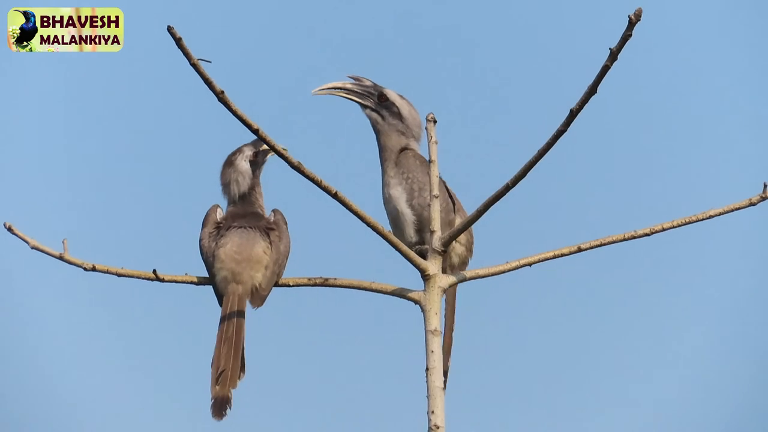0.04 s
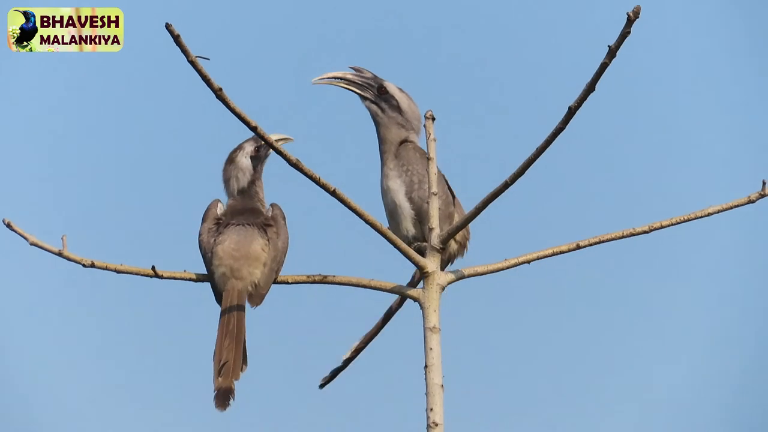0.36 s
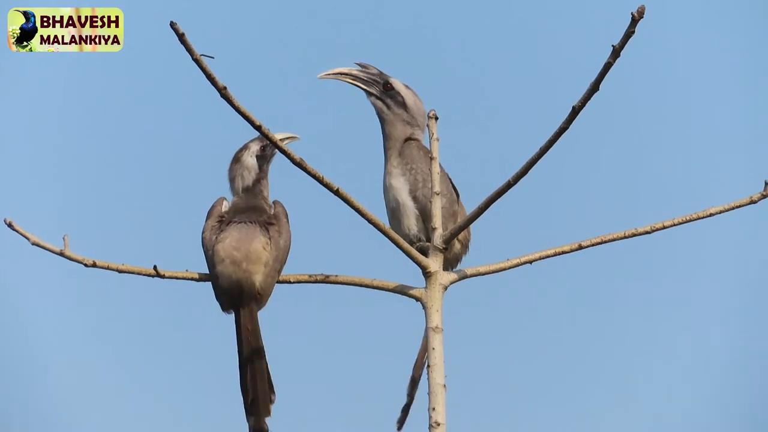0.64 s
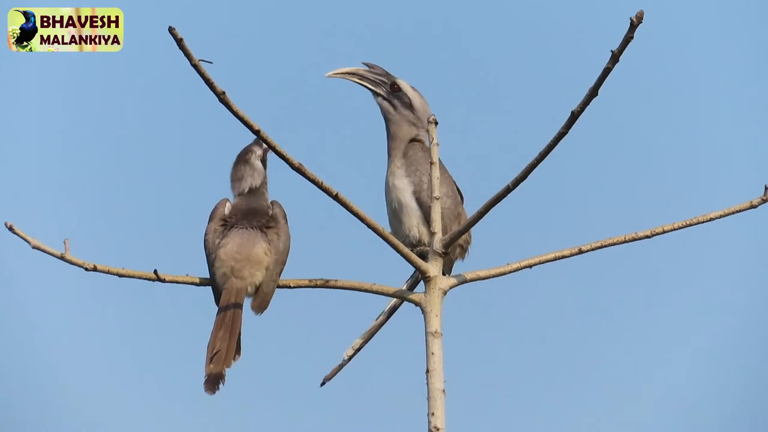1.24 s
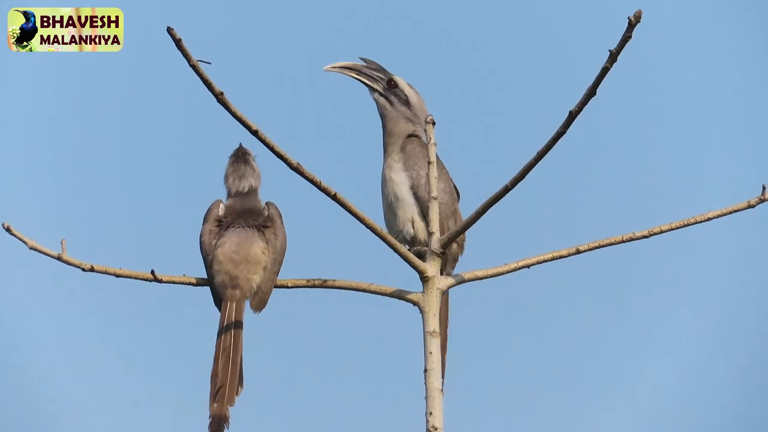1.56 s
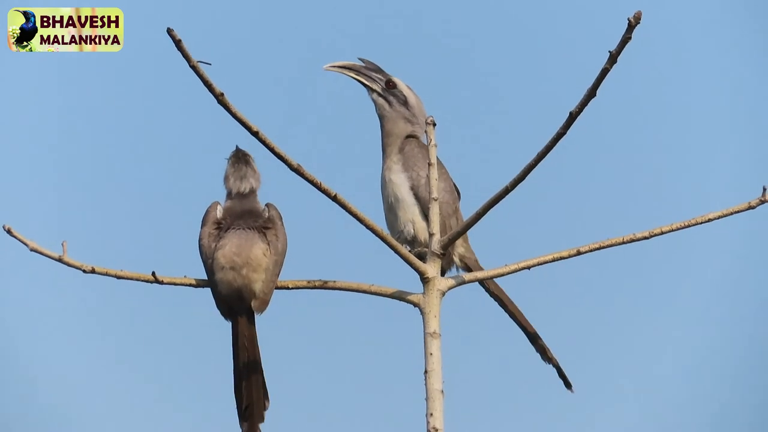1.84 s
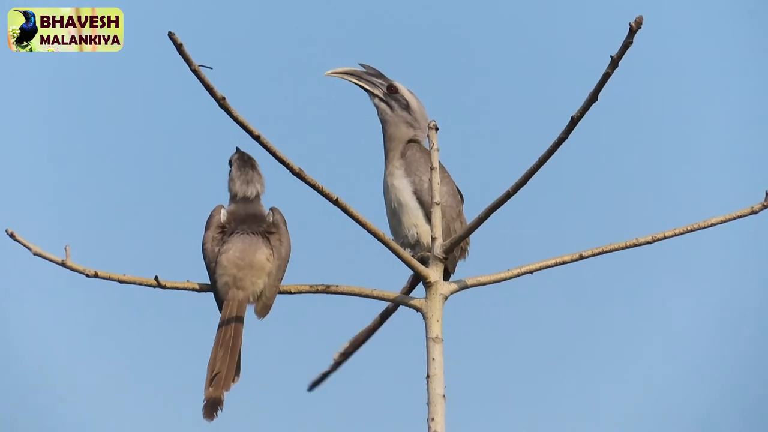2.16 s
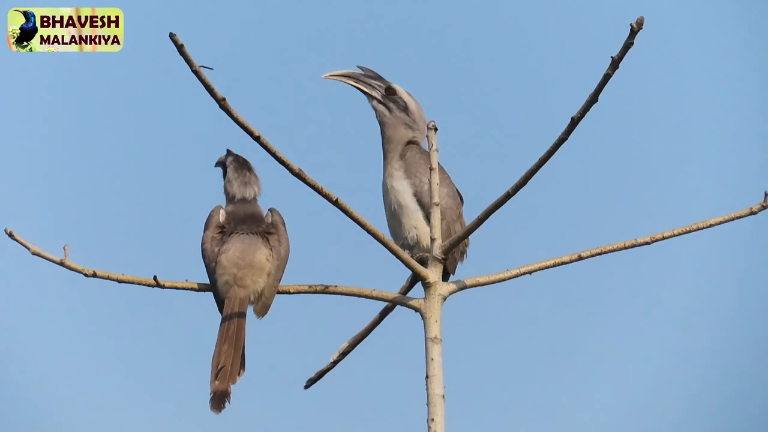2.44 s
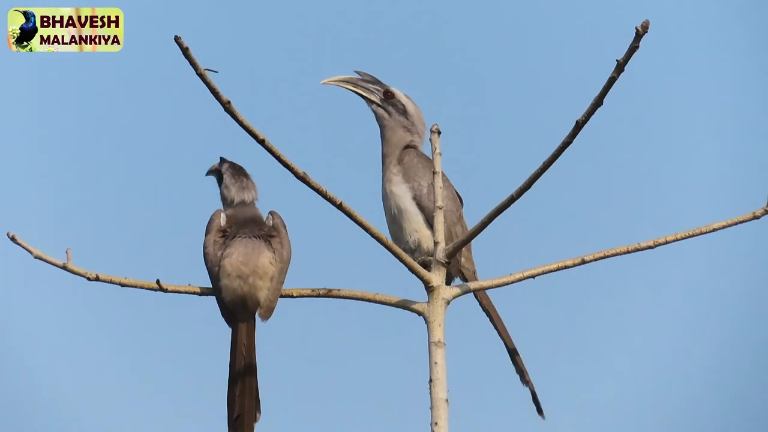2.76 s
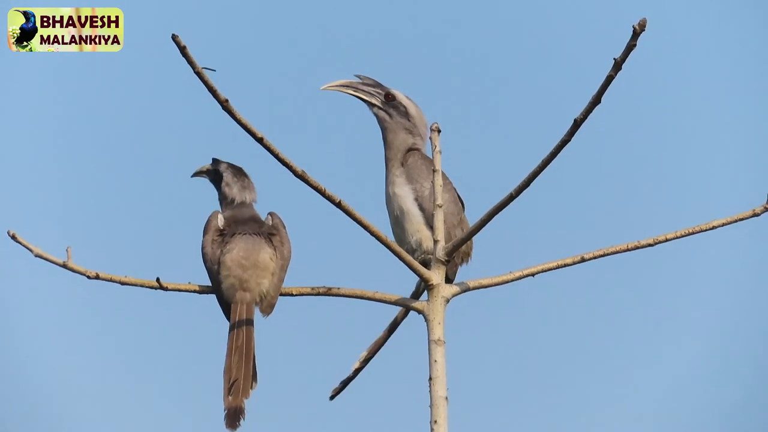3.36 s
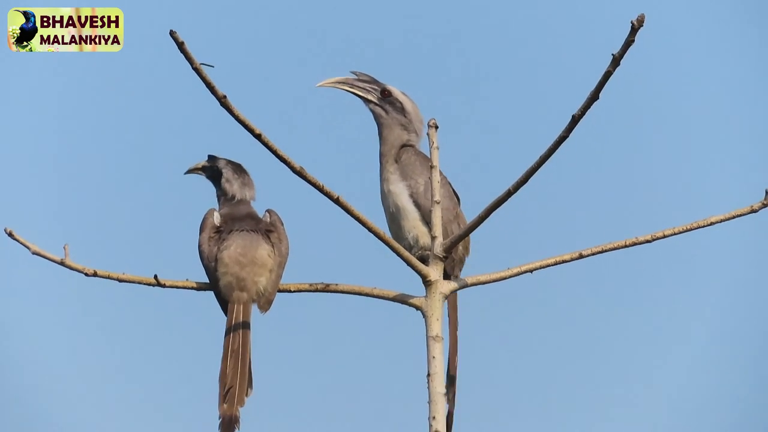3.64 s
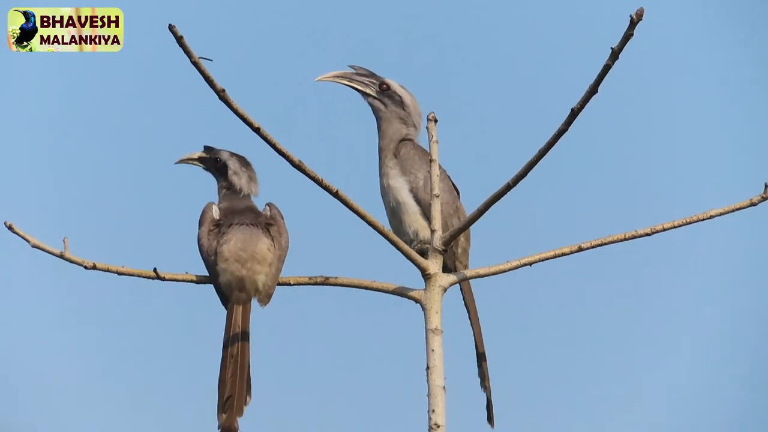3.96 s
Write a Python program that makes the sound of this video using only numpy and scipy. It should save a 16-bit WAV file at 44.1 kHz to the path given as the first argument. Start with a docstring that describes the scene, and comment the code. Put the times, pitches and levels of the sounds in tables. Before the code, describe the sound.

Two hornbills squeal and croak in quick bursts over steady traffic noise.

```python
"""Thin arched squeals and chattering croaks from two grey hornbills in a bare tree.
A croak is a rasp of pulses ringing the throat, in which the voice hops between three throat pitches.
A lower second voice slides under each squeal; twice the two mix into harsh sum tones.
A small bird chirps far off, all over the rumble and swelling hiss of traffic."""
import sys
import numpy as np
from scipy import signal
from scipy.fft import rfft, irfft, next_fast_len
from scipy.io import wavfile
from scipy.ndimage import map_coordinates

SR = 44100
rng = np.random.default_rng(int(sys.argv[2]) if len(sys.argv) > 2 else 0)


def log_audio(samples):
    """Write samples as a 16-bit WAV file to the path given in sys.argv[1]."""
    # one column per channel
    frames = np.atleast_2d(samples).T
    # limit to full scale, then quantise
    limited = np.clip(frames, -1, 1)
    pcm = np.round(limited * 32767).astype(np.int16)
    wavfile.write(sys.argv[1], SR, pcm)


N = 176400
T = np.arange(N) / SR

# Pips within the croaks. Each row: centre in seconds, pitch in Hz, relative level in dB.
CROAK_PIPS = [(0.003, 1840, -32), (0.02, 1830, -33), (0.024, 2250, -32.5), (0.264, 2470, -35.5),
              (0.285, 1830, -31), (0.302, 2380, -31), (0.306, 1860, -29), (0.323, 1890, -32.5),
              (0.328, 3170, -38), (0.346, 1750, -36.5), (0.355, 2960, -40.5), (0.575, 1785, -34),
              (0.591, 3110, -33), (0.608, 1900, -35.5), (0.614, 3130, -33.5), (0.621, 1840, -31.5),
              (0.637, 3080, -35), (0.644, 1800, -33), (0.749, 2920, -36.5), (0.758, 1750, -30),
              (0.875, 1770, -35), (0.882, 1730, -30.5), (0.894, 1830, -32.5), (0.898, 3100, -32),
              (0.906, 1765, -33), (0.916, 1830, -30), (0.921, 3130, -31.5), (1.046, 2770, -34.5),
              (1.052, 1730, -34), (1.151, 2350, -30.5), (1.167, 1740, -35), (1.171, 3060, -28.5),
              (1.19, 2360, -32.5), (1.194, 3040, -30), (1.203, 1840, -31.5), (1.317, 2240, -32),
              (1.319, 2830, -34.5), (1.328, 1710, -31), (1.434, 2320, -32), (1.438, 2950, -28),
              (1.447, 1790, -35), (1.464, 3000, -27.5), (1.473, 1780, -36.5), (2.074, 2890, -35),
              (2.1, 2940, -32.5), (2.104, 1750, -34), (2.128, 2920, -39), (2.151, 2350, -40),
              (2.364, 2350, -33), (2.365, 2810, -34.5), (2.375, 1900, -35.5), (2.389, 2800, -36)]


def amp(db):
    """Decibels to gain."""
    return 10 ** (np.asarray(db) / 20)


def unit(x):
    """Scale to rms 1."""
    return x / np.sqrt(np.mean(x ** 2) + 1e-20)


def along(points, hz):
    """Interpolate (Hz, value) points on a log frequency axis."""
    knots_hz, values = np.transpose(points)
    return np.interp(np.log(hz + 1), np.log(knots_hz + 1), values)


def curves(rows):
    """One value per sample for each column after the time."""
    times_s, *columns = np.transpose(rows)
    return [np.interp(T, times_s, column) for column in columns]


def wobble(rate_hz, t):
    """Smooth random curve over t, rate_hz knots a second."""
    position = (t - t[0]) * rate_hz
    return map_coordinates(rng.standard_normal(4096), [position], mode="mirror")


def filtered(x, response):
    """Apply a frequency response, given as a function of Hz."""
    size = next_fast_len(N + SR // 4)
    return irfft(rfft(x, size) * response(np.fft.rfftfreq(size, 1 / SR)), size)[..., :N]


def noise(spectrum):
    """Coloured stereo noise of rms 1, near mono in the bass."""
    # Each row: frequency in Hz, left-right correlation.
    correlation = [(50, 1), (120, 1), (200, 0.93), (320, 0.4), (550, 0.89), (1200, 1), (3000, 1), (5000, 1),
                   (8000, .35)]

    def mid_side_gains(hz):
        angle = np.arccos(np.clip(along(correlation, hz), -1, 1)) / 2
        return amp(along(spectrum, hz)) * [np.cos(angle), np.sin(angle)]

    mid, side = filtered(rng.standard_normal((2, N)), mid_side_gains)
    return unit(np.array([mid + side, mid - side]))


def note(start_s, length_s, attack_s, release_s):
    """Sample indices, times and attack-hold-release envelope of one note."""
    i = np.flatnonzero((T >= start_s) & (T < start_s + length_s))
    t = T[i]
    ramp = np.minimum((t - start_s) / attack_s, (start_s + length_s - t) / release_s)
    return i, t, np.sin(np.pi / 2 * np.clip(ramp, 0, 1))


def phase(hz, t, jitter=0.012):
    """Phase of a slightly unsteady voice."""
    unsteady_hz = hz * (1 + jitter * wobble(940, t))
    return 2 * np.pi * (rng.random() + np.cumsum(unsteady_hz) / SR)


def from_right(x, lag_s):
    """Stereo in which the left channel trails the right by lag_s."""
    return filtered(x, lambda hz: np.exp(1j * np.pi * hz * lag_s * np.array([[-1], [1]])))


def squeals(end_hz=2513, flutter_hz=330, flutter_db=4, shimmer_db=1):
    """A thin whistle arches up, then sinks and flutters; its octave is strong only near the crest."""
    # Each row: start, crest and end in seconds, crest pitch in Hz, arch exponent,
    # fundamental and octave levels at the crest in dB.
    calls = [(0.056, 0.081, .146, 3090, 1.9, -38.5, -45), (0.385, 0.427, .484, 3003, 1.38, -41, -43),
             (0.949, 0.965, 1.022, 3005, 2.7, -38.5, -39.5), (3.222, 3.251, 3.335, 3120, 1.65, -32, -40)]
    out = np.zeros(N)
    for start_s, crest_s, end_s, crest_hz, arch, db, octave_db in calls:
        i, t, env = note(start_s, end_s - start_s, attack_s=0.004, release_s=0.0054)
        sag = np.abs((t - crest_s) / (end_s - crest_s)) ** arch  # 0 at the crest, 1 at the end
        ph = phase(crest_hz - (crest_hz - end_hz) * sag, t, jitter=0.005)
        env = env * amp(flutter_db * np.sqrt(sag) * wobble(flutter_hz, t))
        third_db = -71 - 4 * sag + 3.5 * wobble(flutter_hz, t)
        harmonics_db = [db - 9.5 * sag, octave_db - 28.5 * sag, third_db]
        for k, level_db in enumerate(harmonics_db, 1):
            gain = amp(level_db + shimmer_db * wobble(flutter_hz, t))
            out[i] += np.sqrt(2) * env * gain * np.sin(k * ph)
    return out


def slides():
    """The lower voice glides briefly, with weak overtones coloured by the bill."""
    # Each row: start and length in seconds, first and last pitch in Hz, level and overtone gain in dB.
    glides = [(0.034, 0.02, 1613, 1894, -32, -3), (.446, 0.023, 1740, 1727, -34, -5),
              (.925, .029, 1553, 2240, -34.5, 1), (3.203, 0.03, 2113, 2390, -33, -1)]
    # Overtone colour. Each row: frequency in Hz, gain in dB.
    bill_response = [(3500, -16), (4600, -25), (5400, -27), (7200, -22), (8300, -29), (10000, -47)]
    out = np.zeros(N)
    for start_s, length_s, from_hz, to_hz, db, overtones_db in glides:
        i, t, env = note(start_s, length_s, attack_s=0.005, release_s=0.0035)
        hz = from_hz + (to_hz - from_hz) * (t - start_s) / length_s
        ph = phase(hz, t, jitter=0.014)
        overtones = sum(amp(along(bill_response, k * hz)) * np.sin(k * ph) for k in range(2, 6))
        out[i] += np.sqrt(2) * env * amp(db) * (np.sin(ph) + amp(overtones_db) * overtones)
    return out


def pips(edge_s=0.0046, stretch_per_db=0.035, trim_db=-1, octave_db=-32):
    """The croaking voice locks on to one throat resonance after another; stronger pips hold longer."""
    out = np.zeros(N)
    for centre_s, hz, db in CROAK_PIPS:
        length_s = 0.0115 * np.exp(stretch_per_db * (db + 32))
        i, t, env = note(centre_s - length_s / 2, length_s, edge_s, edge_s)
        ph = phase(hz, t)
        out[i] += amp(db + trim_db) * env * (np.sin(ph) + amp(octave_db) * np.sin(2 * ph))
    return out


def throat_ring(age_s, rise_s=0.0009, t60_s=0.014, pitch_spread=0.036, spread_db=3.5):
    """One pulse rings the throat, a little differently each time."""
    # Each row: resonance in Hz, relative level in dB.
    modes = [(1800, 1.5), (2380, 2), (3080, -3.5), (3600, -10), (4400, -11)]
    hz, mode_db = np.transpose(modes)[:, :, None]
    detune, vary = rng.standard_normal((2, len(modes), 1))
    decay = amp(mode_db + spread_db * vary - 60 * age_s / t60_s)
    rings = decay * np.sin(2 * np.pi * hz * (1 + pitch_spread * detune) * age_s)
    return rings.sum(0) * (1 - np.exp(-age_s / rise_s))


def rasp(pulse_hz=330, flare_gain=0.45, flare_lead_s=0.0047, flare_width_s=0.0037, air_rough_db=5):
    """Uneven throat pulses flare just ahead of each pip; air hisses at the height of the croak."""
    # Each row: start and length in seconds, rasp and air levels in dB.
    croaks = [(-.01, 0.04, -42, -64), (0.274, 0.098, -41.5, -63), (.568, 0.098, -41, -59.5),
              (0.733, 0.038, -42.5, -66), (0.858, 0.089, -40, -62), (1.029, 0.056, -47, -76),
              (1.146, 0.085, -42, -65), (1.312, 0.04, -43, -74), (1.428, 0.065, -41, -69),
              (2.07, 0.09, -45.5, -89), (2.357, 0.049, -46.5, -80)]
    # Each row: frequency in Hz, gain in dB.
    air_spectrum = [(3000, -25), (4500, 3), (7000, -1), (8500, 5.5), (10500, 1), (13000, -16)]
    out, air_env = np.zeros((2, N))
    age_s = T[:SR // 40]
    for start_s, length_s, db, air_db in croaks:
        i, t, env = note(start_s, length_s, attack_s=0.009, release_s=0.009)
        rattle = np.zeros(len(t) + len(age_s))
        for pulse in range(int(length_s * pulse_hz)):
            pulse_s = start_s + (pulse + rng.random()) / pulse_hz
            onset = np.searchsorted(t, pulse_s)
            rattle[onset:onset + len(age_s)] += throat_ring(age_s) * (pulse_s > 0)
        flares = [np.exp(-((t - pip_s + flare_lead_s) / flare_width_s) ** 2)
                  for pip_s, _, _ in CROAK_PIPS]
        emphasis = 1 + flare_gain * np.max(flares, axis=0)
        out[i] += amp(db) * env * unit(rattle[:len(t)] * emphasis)
        roughness = unit(amp(air_rough_db * np.tanh(wobble(pulse_hz, t))))
        air_env[i] += amp(air_db) * np.sin(np.pi * (t - start_s) / length_s) * roughness
    return out + air_env * noise(air_spectrum)[0]


def voice_breaks(low_hz=2125, high_hz=2990):
    """Where the lower voice breaks into the squeal, the two mix into harsh sum tones."""
    # Each row: start and length in seconds, level in dB.
    overlaps = [(0.938, 0.018, -48), (3.223, 0.016, -55)]
    out = np.zeros(N)
    for start_s, length_s, db in overlaps:
        i, t, env = note(start_s, length_s, attack_s=0.004, release_s=0.003)
        low, high = phase(low_hz, t), phase(high_hz, t)
        out[i] += amp(db) * env * (np.sin(high + low) + np.sin(3 * low) + np.sin(high + 2 * low))
    return out


def small_bird(flutter_hz=132, flutter_db=3.6):
    """Faint gliding chirps from far away."""
    # Each row: start and length in seconds, first and last pitch in Hz, relative level in dB.
    chirps = [(0.794, 0.065, 5220, 5170, -63), (1.451, 0.07, 7560, 6950, -61),
              (1.55, 0.08, 5250, 5140, -60), (1.705, 0.12, 7000, 7300, -65), (1.925, 0.05, 5100, 4980, -58),
              (2.256, 0.11, 4750, 5620, -62), (2.549, 0.051, 3560, 2600, -51),
              (2.843, .12, 5500, 5200, -65), (3.34, 0.091, 5200, 5030, -64),
              (3.685, 0.047, 4450, 4730, -55)]
    out = np.zeros(N)
    for start_s, length_s, from_hz, to_hz, db in chirps:
        i, t, env = note(start_s, length_s, attack_s=length_s / 2, release_s=0.0081)
        hz = from_hz + (to_hz - from_hz) * (t - start_s) / length_s
        out[i] += env * amp(db + flutter_db * wobble(flutter_hz, t)) * np.sin(phase(hz, t))
    return out


def echo(x, t60_s=1.05, rise_s=0.015):
    """Half a second of thin scatter from the surroundings."""
    t = T[:SR // 2]
    tail = rng.standard_normal((2, len(t))) * amp(-60 * t / t60_s) * (1 - np.exp(-t / rise_s))
    return signal.fftconvolve(x[None], tail / np.linalg.norm(tail[0]), axes=1)[:, :N]


def traffic(low_trim_db=2, high_trim_db=1.5, pan_db=1, air_db=-51):
    """Engine rumble, tyre hiss that slowly swells, and a steady airy floor."""
    # Each row: time in seconds, relative levels of the low and high hiss in dB.
    hiss_levels = [(0, -46, -45.5), (.6, -46, -45), (1.3, -43, -44), (1.9, -43.5, -44), (2.4, -43.5, -42),
                   (2.92, -43, -38.5), (3.4, -43.5, -40.5), (3.85, -39, -39.5), (4, -40, -42)]
    # Each row: time in seconds, level in dB.
    rumble_levels = [(0, -34.5), (.7, -35), (1.3, -34), (2.3, -34), (3.2, -31), (3.65, -34), (4, -31.5)]
    # Four spectra. Each row: frequency in Hz, gain in dB.
    low_spectrum = [(100, -8), (250, -0.5), (400, -2), (550, 0), (800, 1), (1050, 0.5), (1500, -12.5),
                    (3000, -35), (9000, -89)]
    high_spectrum = [(500, -18.5), (900, -6.5), (1200, 1), (1700, -.5), (2200, -4.5), (3000, -14),
                     (4000, -18), (6000, -29), (13000, -82)]
    rumble_spectrum = [(15, -34), (30, -8), (42, -3), (54, 2.5), (68, -2), (110, -3), (185, -9.5),
                       (300, -20), (450, -27), (900, -94)]
    air_spectrum = [(1500, -7), (3000, 4.5), (4500, -5), (6000, -9), (7200, -9), (8500, -16), (10000, -19),
                    (12700, -26), (13300, -42)]
    low_db, high_db = curves(hiss_levels)
    rumble_db, = curves(rumble_levels)
    low_hiss = amp(low_db + low_trim_db) * noise(low_spectrum)
    high_hiss = amp(high_db + high_trim_db) * noise(high_spectrum)
    tyres = (low_hiss + high_hiss) * amp([[-pan_db], [pan_db]])
    engines = amp(rumble_db) * noise(rumble_spectrum)
    return tyres + engines + amp(air_db) * noise(air_spectrum)


def scene():
    """Hornbills nearly straight ahead, the small bird with much scatter, traffic to the right."""
    hornbills = squeals() + slides() + pips() + rasp() + voice_breaks()
    far_bird = small_bird()
    direct = from_right(hornbills, lag_s=1e-5) * amp([[-0.2], [0.2]]) + amp(1) * far_bird
    scatter = echo(amp(-17) * hornbills + amp(-1.5) * far_bird)
    return direct + scatter + from_right(traffic(), lag_s=4e-5)


def record(dry):
    """Brick-wall low-pass."""
    return filtered(dry, lambda hz: hz < 13400)


dry = scene()
out = record(dry)
log_audio(out)
```